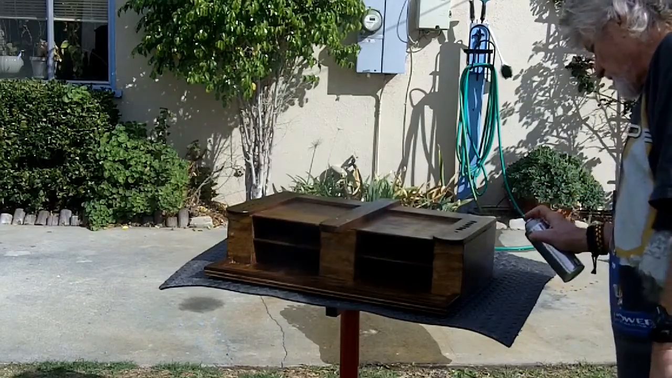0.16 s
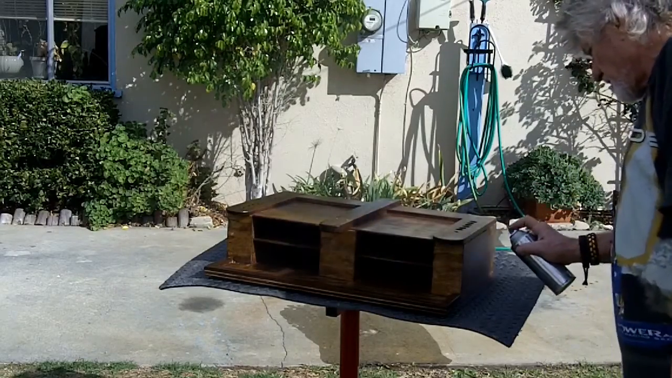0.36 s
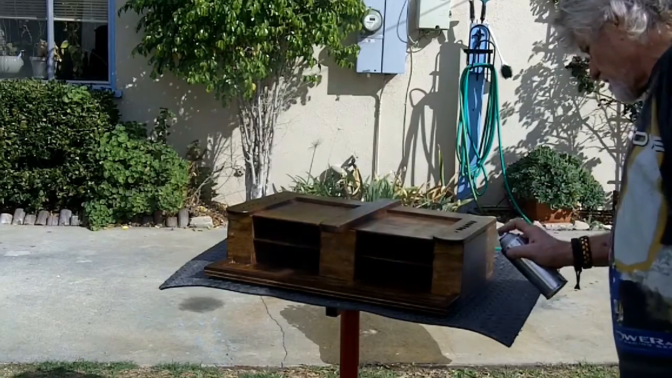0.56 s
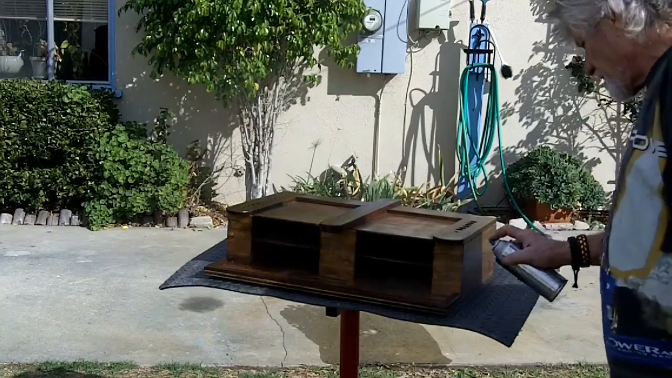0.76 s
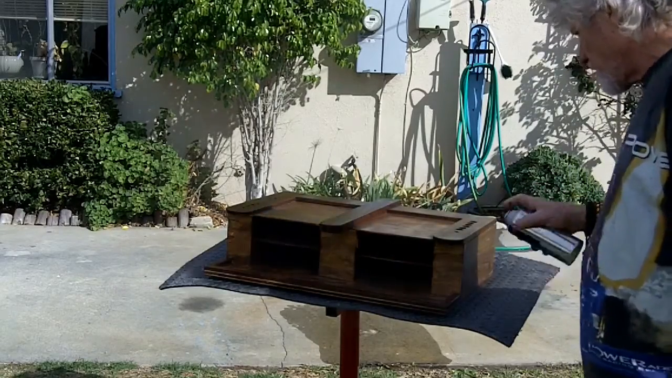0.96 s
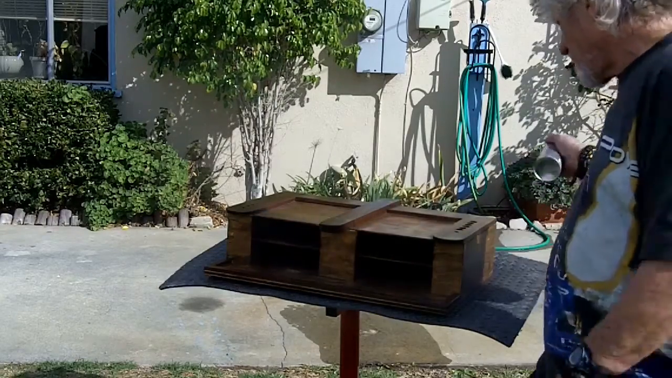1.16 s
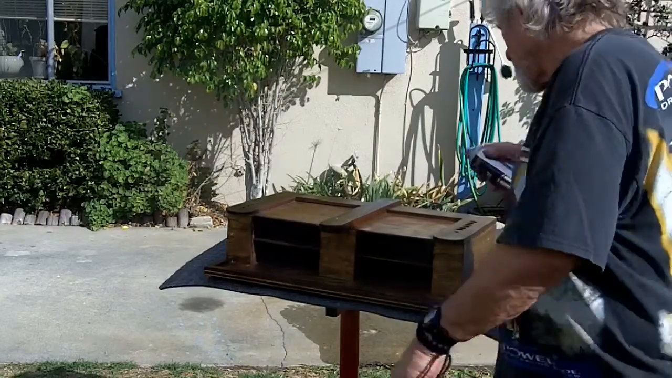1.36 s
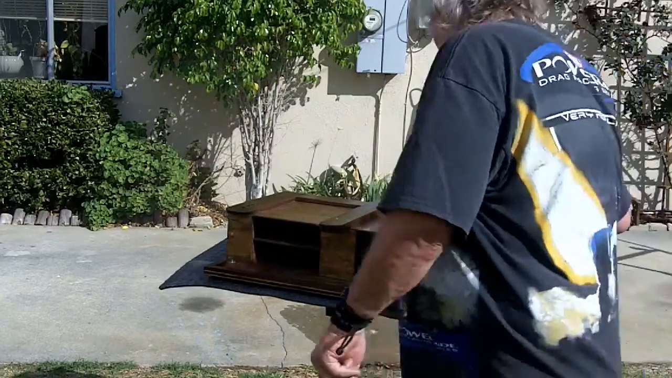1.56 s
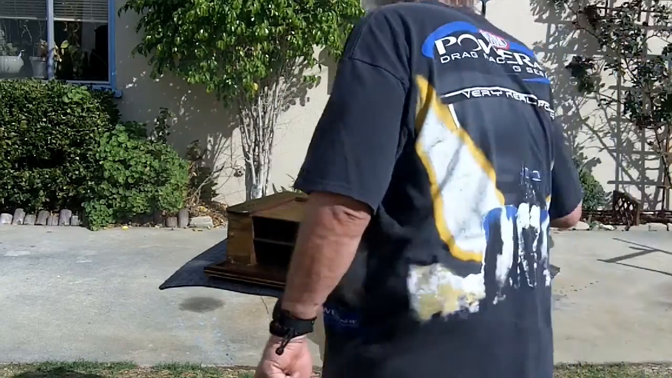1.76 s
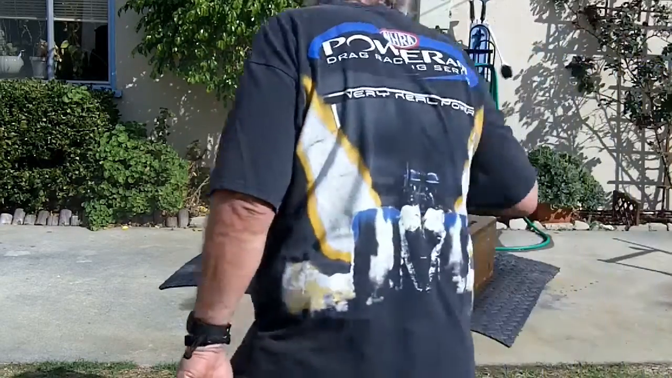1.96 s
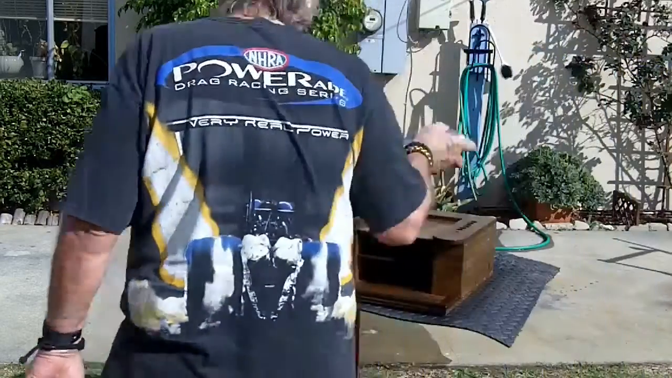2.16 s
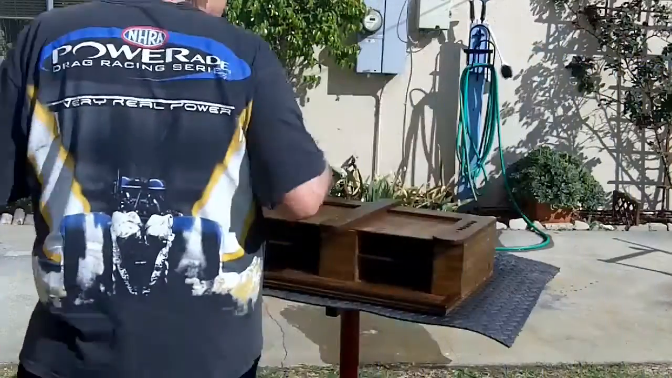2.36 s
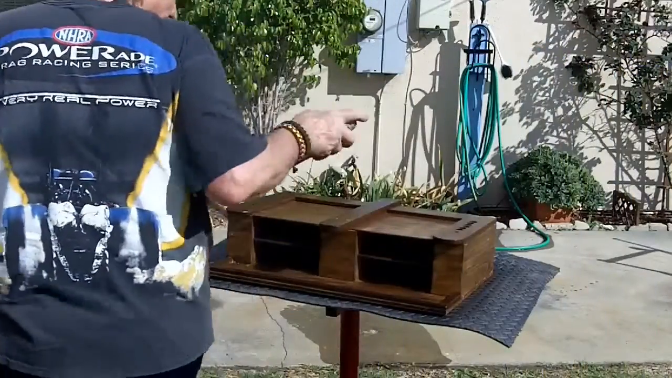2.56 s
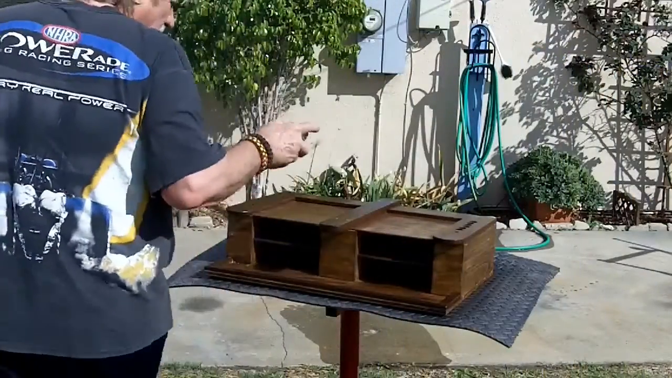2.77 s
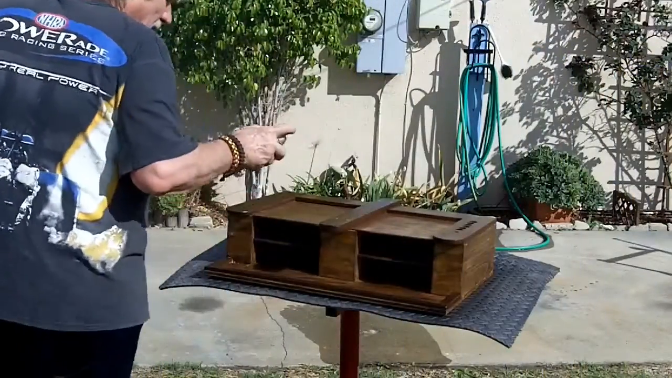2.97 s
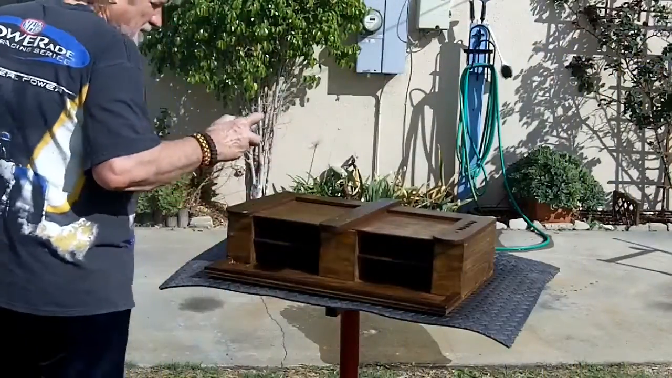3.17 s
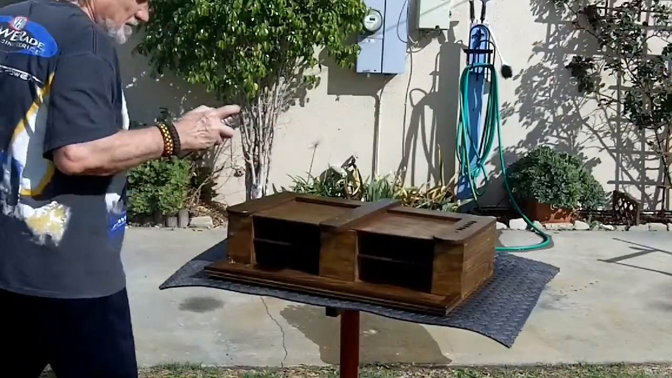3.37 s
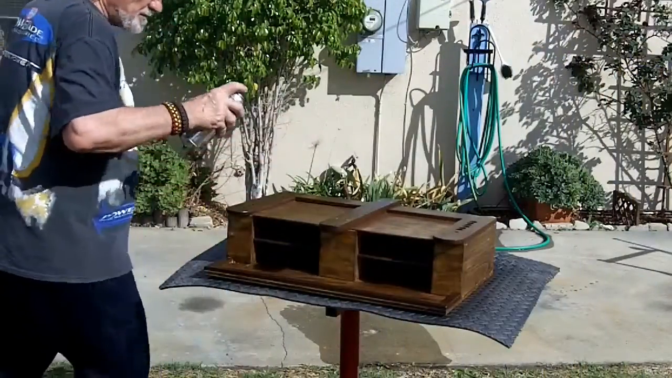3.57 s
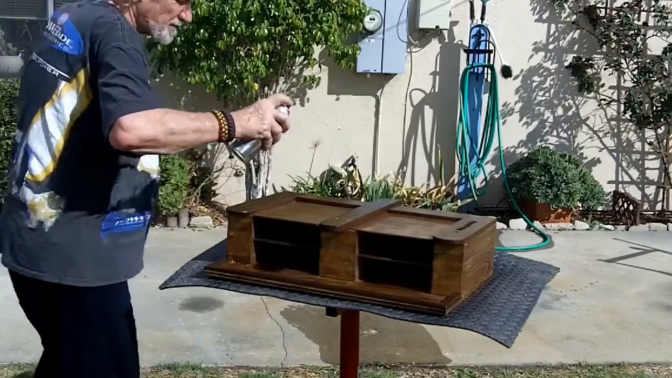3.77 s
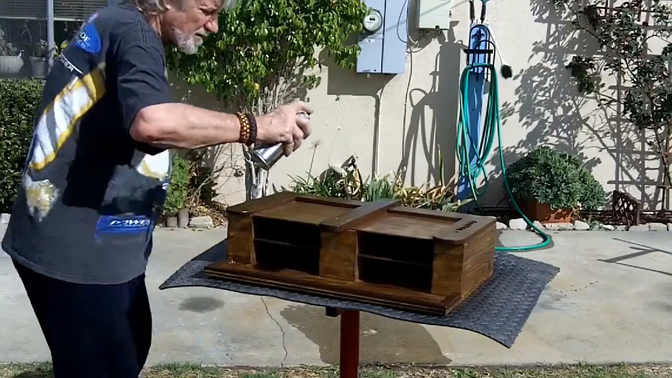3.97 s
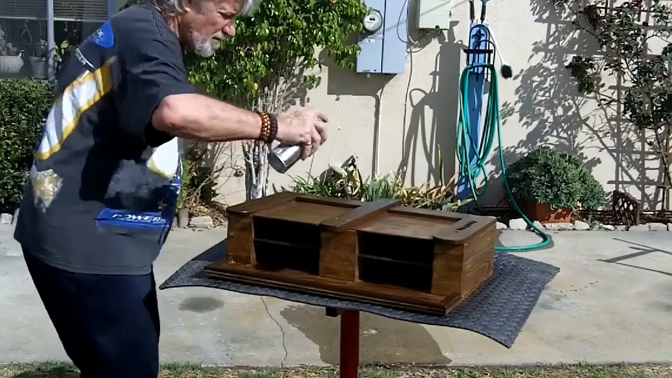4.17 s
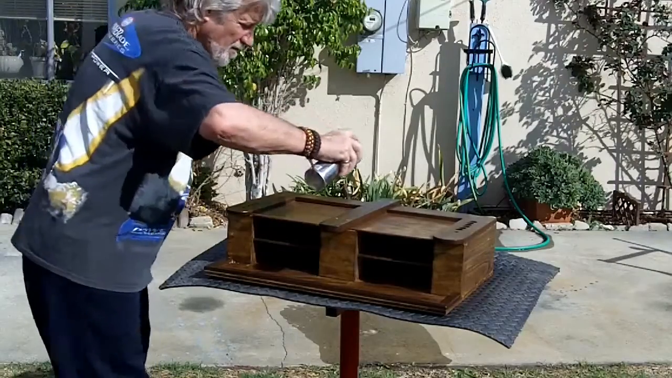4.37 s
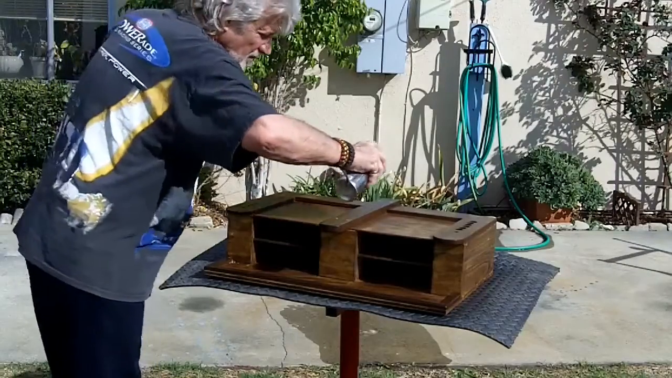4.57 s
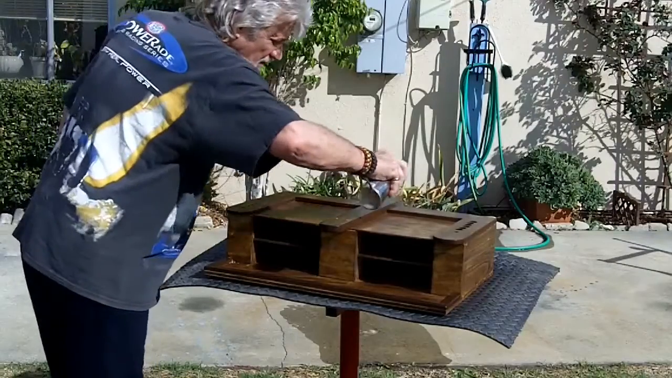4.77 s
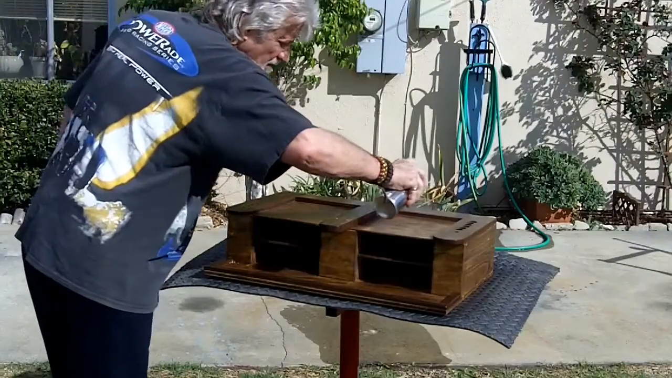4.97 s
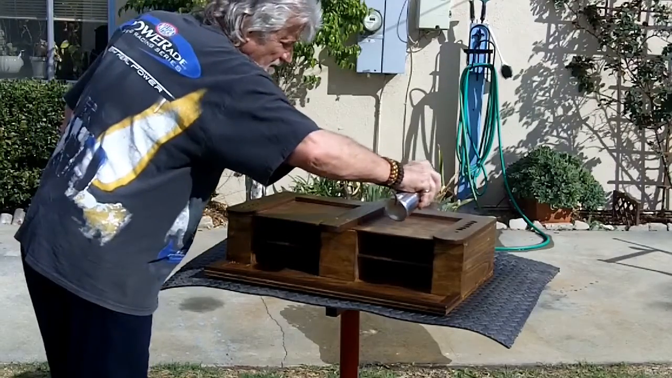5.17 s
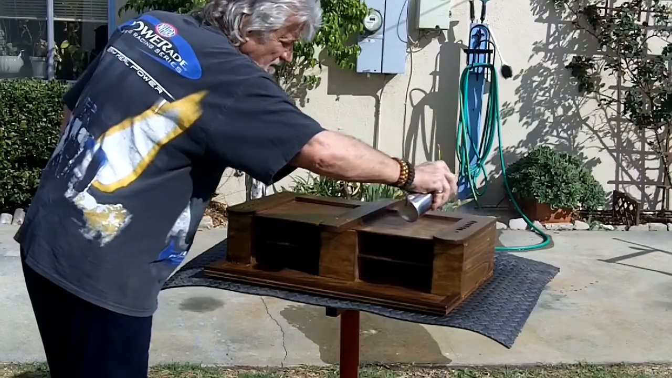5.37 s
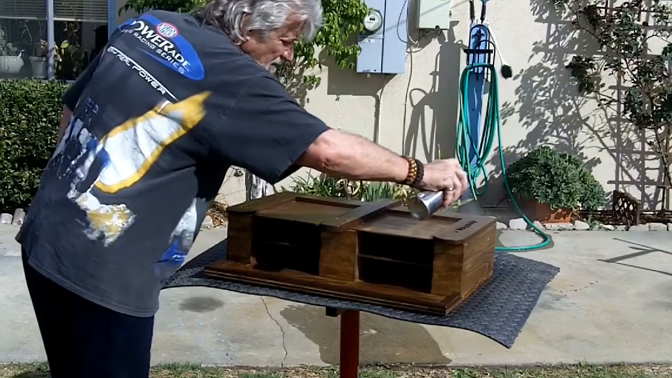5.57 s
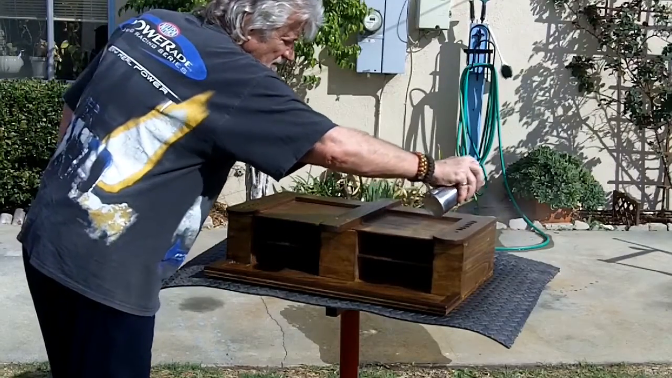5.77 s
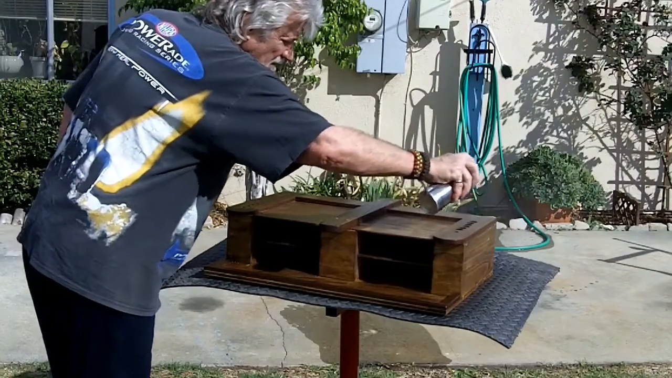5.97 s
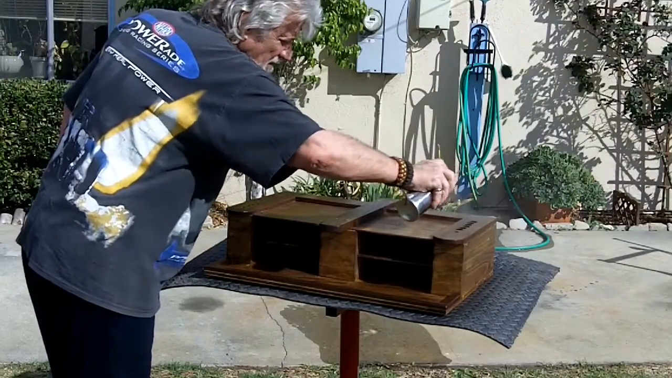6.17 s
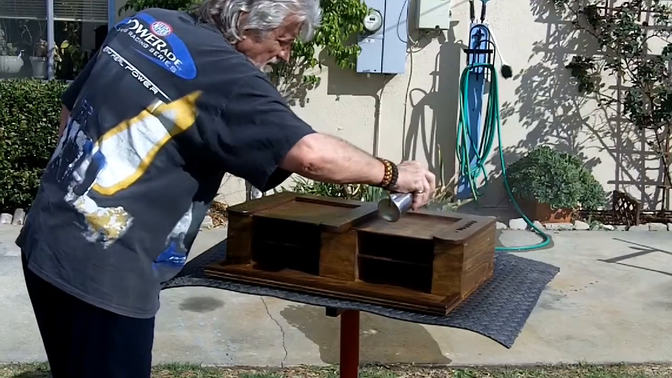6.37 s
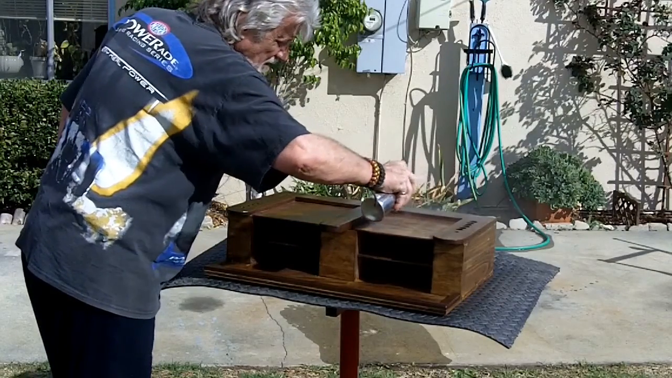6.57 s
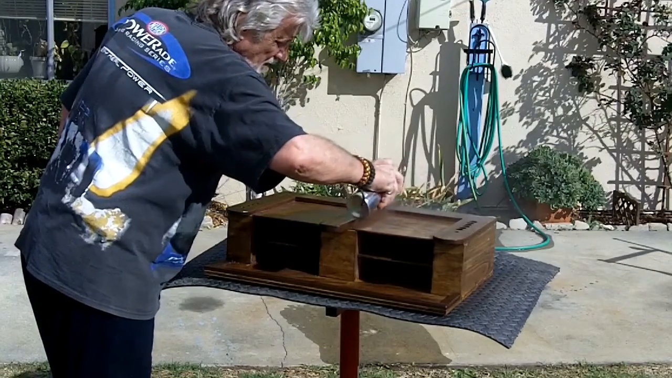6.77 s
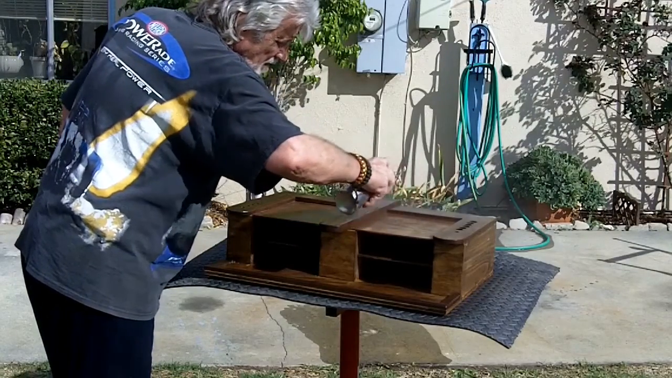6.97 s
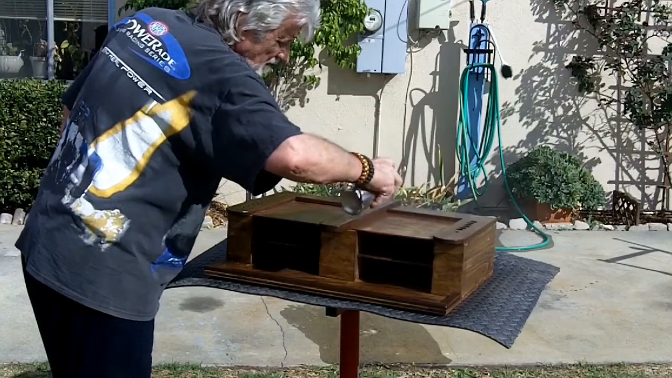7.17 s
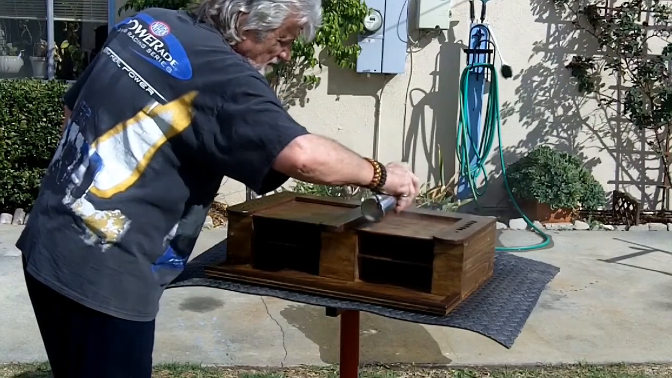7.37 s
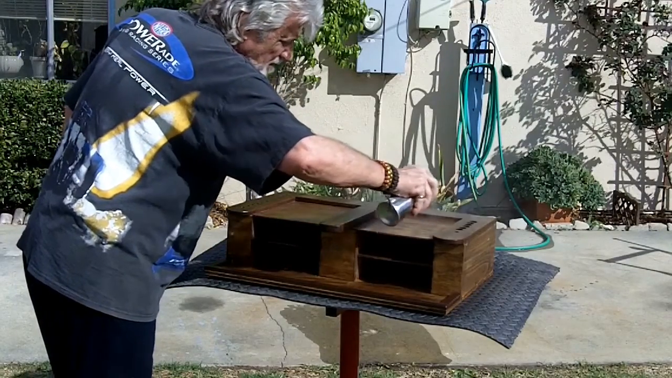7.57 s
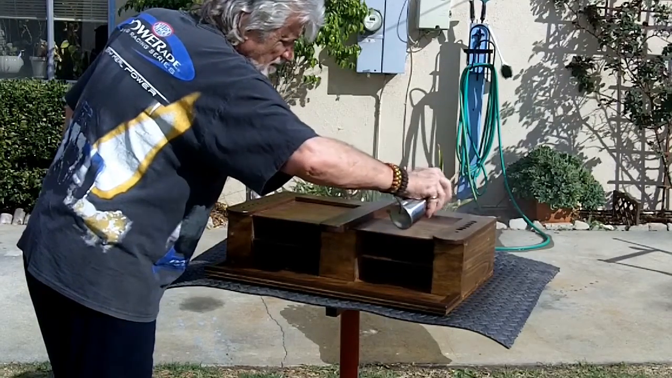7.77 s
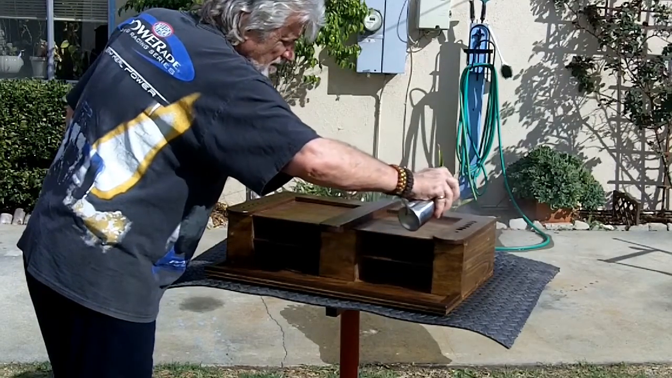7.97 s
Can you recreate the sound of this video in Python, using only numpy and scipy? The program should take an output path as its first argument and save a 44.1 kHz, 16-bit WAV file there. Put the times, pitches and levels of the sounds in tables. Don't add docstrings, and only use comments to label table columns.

```python
import sys
import numpy as np
from scipy import signal
from scipy.fft import rfft, irfft, next_fast_len
from scipy.io import wavfile
from scipy.ndimage import uniform_filter1d

SR = 44100
rng = np.random.default_rng(int(sys.argv[2]) if len(sys.argv) > 2 else 0)


def put_to_file(sound):
    columns = np.atleast_2d(sound).T
    safe = np.clip(columns, -1, 1)
    whole_steps = np.round(safe * 32767)
    wavfile.write(sys.argv[1], SR, whole_steps.astype(np.int16))


def makeup_ratio(level_db):
    decades = np.asarray(level_db, float) / 20
    return 10 ** decades


N = 353241

# pitch in Hz, level in dB, t60 in seconds.
WALL_MODES = [(807, -3.5, 0.016), (1460, 4.5, 0.016), (1800, -0.5, 0.0096), (2000, -8.5, 0.021),
              (2160, -6, 0.045), (2340, -1.5, 0.013)]
# pitch in Hz, level in dB, t60 in seconds.
SHELL_MODES = [(2850, -8.5, 0.0095), (3350, -6.5, 0.0075), (3700, -1, 0.04), (4100, -5, 0.012),
               (4350, -5.5, 0.0077)]
# frequency in Hz, level in dB per Hz.
HISS_SPECTRUM = [(2650, -23), (4500, -4), (5120, -13.5), (5420, -8.5), (6430, 0), (9530, -9.5),
                 (12000, -19), (15500, -29)]


def knocks():
    # pitch in Hz, level in dB, t60 in seconds.
    dome_modes = [(6300, 10, 0.011), (6680, 0.5, 0.019), (7180, -2.5, 0.004), (8300, -2.5, 0.005),
                  (9200, -9.5, 0.0055), (10100, -4.5, 0.005)]
    # pitch in Hz, level in dB, t60 in seconds.
    contact_modes = [(10800, -2, .004), (12200, -5, .003), (13800, -8, .003)]
    # time in seconds, shell, dome and contact pitch in Hz.
    landings = [(1.412, 4010.0, 8550, 10900), (1.4991, 3080.0, 7310.0, 10750.0),
                (1.5035, 3270, 6940, 12920.0), (1.5135, 2950, 9300, 11940), (1.526, 3440.0, 7100, 11120.0),
                (1.6093, 3880, 6610, 10700), (1.7541, 2830, 9440, 10860), (1.7635, 3350, 8900, 10810.0),
                (1.781, 3700, 7380.0, 10780.0), (1.9245, 4200, 6700, 11480.0), (2.0829, 3750, 7900, 11400),
                (2.11, 3400, 7580, 11230.0), (2.254, 3800, 6380.0, 11600), (2.3497, 2900, 7150, 11320),
                (2.406, 3920.0, 7370, 11640), (2.424, 3350.0, 8340, 10700),
                (2.453, 3440.0, 7090.0, 11580.0), (2.4746, 3700.0, 6640, 10750.0),
                (2.5613, 3320, 6540, 11010.0), (2.6794, 3640, 6470, 11340.0), (2.822, 4200, 6700, 11770),
                (2.9929, 3170.0, 6730, 11000), (3.0524, 4000, 7100, 11850.0), (3.0894, 3130, 6840, 11900.0),
                (3.1648, 3700, 6680, 10500)]
    crack_t60_s = [0.0034, 0.0036, .002]
    # from Hz, to Hz, level in dB over the blow, t60 in seconds.
    patter = [
        (2400, 5000, -11.5, 0.019),
        (5830, 10800, -9.5, 0.015),
        (10820, 15000, -16.5, .008),
    ]
    crack_db, ring_db, ring_spread = 8, -14.5, 0.035
    wet_after_s, wet_roughness = 0.0028, 0.4
    touch_s, softer_per_db, hard_db = 0.00013, 0.45, -19

    table = contacts()
    out = np.zeros(N + 4096)
    chance = rng.standard_normal((len(table), 24))
    t = np.arange(2600) / SR
    film = drift(200)
    scatter = [rms_one(band(rng.standard_normal(N), low_hz, high_hz)) for low_hz, high_hz, *_ in patter]
    landed, *cracks_hz = np.transpose(landings)

    def mode(hz, level_db, t60):
        return makeup_ratio(level_db - 60 * t / t60) * np.sin(2 * np.pi * hz * t)

    for (s, wall_hz, wall_db, *upper_db), luck in zip(table, chance):
        at = round(s * SR)
        span = slice(at, at + len(t))
        hit = mode(wall_hz, wall_db - 0.5, 0.01)
        hit += mode(wall_hz, wall_db - 12.5, 0.022)
        hit += mode(670, wall_db - 12.0, 0.0087)
        for (hz, level_db, t60), z in zip(WALL_MODES, luck):
            hit += mode(hz * (1 + 0.065 * z), wall_db + level_db - 12.0 + 3.8 * z, t60)
        k = len(WALL_MODES)
        for group, modes in enumerate((SHELL_MODES, dome_modes, contact_modes)):
            blow_db = upper_db[group]
            crack_hz = np.interp(s, landed, cracks_hz[group])
            hit += mode(crack_hz, blow_db + crack_db, crack_t60_s[group])
            _, _, patter_db, patter_t60 = patter[group]
            hit += makeup_ratio(blow_db + patter_db - 60 * t / patter_t60) * scatter[group][span]
            for hz, level_db, t60 in modes:
                k += 1
                mode_db = blow_db + level_db + ring_db + 3.0 * luck[k]
                hit += (-1) ** k * mode(hz * (1 + ring_spread * luck[k - 1]), mode_db, t60)
        softness_db = max(hard_db - max(wall_db, *upper_db), 0)
        touch = (1 - np.exp(-t / (touch_s * makeup_ratio(softer_per_db * softness_db)))) ** 2
        wetness = wet_roughness * np.clip(t / wet_after_s - 0.5, 0, 1)
        out[span] += touch * hit * (1 + wetness * film[span])
    return signal.sosfilt(signal.butter(2, 250, "high", fs=SR, output="sos"), out[:N])


def contacts():
    # time in seconds, wall, shell, dome and click level in dB.
    square = [
        (1.5035, -28, -24, -27.5, -33.5),
        (1.5146, -27, -21.5, -26.5, -26),
        (1.6093, -19.5, -21, -23, -27.5),
        (1.7543, -27, -22.5, -25, -31),
        (2.4071, -16.5, -5.5, -23.5, -18),
        (2.822, -32, -25.5, -22, -32),
        (3.165, -31.5, -28.5, -44, -43),
    ]
    # time in seconds, wall pitch in Hz, wall, shell and dome level in dB.
    cushioned = [(1.412, 2275, -19, -14.5, -9.5), (1.4225, 2400, -53.5, -37, -34),
                 (1.4392, 2000, -32, -29, -38), (1.499, 1940, -22, -39, -29),
                 (1.5256, 1960, -24, -44, -36.5), (1.7639, 1950, -38, -29, -29),
                 (1.781, 2500, -32, -25.5, -30.5), (1.7935, 1920, -55, -30, -36.5),
                 (1.9249, 1780, -25.5, -29, -31), (2.0302, 1070, -29.5, -38, -52),
                 (2.083, 2160, -29.5, -19, -34), (2.0878, 2240, -46, -28, -26),
                 (2.11, 2650, -33, -25, -33.5), (2.254, 1145, -27, -21.5, -28.5),
                 (2.2582, 2100, -38.5, -24.5, -36), (2.349, 2100, -22.5, -39, -41),
                 (2.4245, 2410, -16.5, -13, -23), (2.452, 2340, -36, -22, -38),
                 (2.4746, 2390, -20, -18, -27.5), (2.481, 1530, -29.5, -38, -40),
                 (2.5614, 1790, -19.5, -19, -22.5), (2.6797, 2010, -29, -38, -40.5),
                 (2.9929, 2160, -25, -26, -29.5), (3.052, 2090, -20, -27.5, -38),
                 (3.0877, 2070, -25, -27, -35.5)]
    # time in seconds, wall and shell level in dB.
    taps = [(1.637, -28, -29), (1.6636, -28.5, -34), (1.711, -30, -37.5), (1.7384, -28.5, -48),
            (1.9532, -34, -32), (1.986, -32, -38.5), (2.0552, -32.5, -42), (2.123, -56, -28),
            (2.1365, -35, -31), (2.281, -34, -30), (2.3133, -27, -32), (2.374, -30, -36),
            (2.4345, -41, -27), (2.5893, -32, -29), (2.717, -29.5, -36), (2.7326, -33, -41),
            (2.779, -38, -38), (2.7861, -32.5, -37), (2.8487, -36, -39), (2.8606, -36, -37),
            (2.9588, -28.5, -42), (3.02, -54, -32), (3.1315, -29.5, -34), (3.1678, -49, -33),
            (3.1868, -35.5, -35), (3.2516, -32, -34.5), (3.2898, -34.5, -48), (3.381, -37, -33)]
    # time in seconds, wall, shell and dome level in dB.
    ticks = [(1.395, -48, -50, -38), (1.479, -49, -33, -49), (1.5353, -26.5, -44, -39),
             (1.5445, -34, -44, -38), (1.553, -30, -50, -50), (1.619, -40, -33, -36),
             (1.6732, -40, -48, -46), (1.679, -37, -55, -55), (1.6905, -38, -55, -55),
             (2.092, -42, -36, -26.5), (2.604, -45, -34, -50), (2.8665, -38, -44, -42),
             (2.872, -37, -45, -47), (2.891, -48, -52, -48), (2.9355, -35.5, -40, -43),
             (2.9475, -36, -41, -40), (2.9703, -35, -46, -51), (2.982, -42, -49, -54),
             (3.08, -44, -48, -45.5), (3.1145, -40, -45, -54), (3.319, -38, -50, -52),
             (3.342, -41, -52, -50), (3.361, -44, -50, -41), (3.4055, -50, -40, -52),
             (3.422, -42, -38, -44), (3.4598, -44, -37, -46), (3.48, -44.5, -39, -50)]
    # time in seconds, pitch in Hz.
    grip_curve = [(1.4, 1986), (1.95, 1920), (2.3, 2100), (2.45, 2390), (2.8, 2280), (2.95, 2100),
                  (3.2, 2170), (3.5, 2220)]

    def grip(s):
        return np.interp(s, *np.transpose(grip_curve))

    light = [(*row, row[-1] - 10) for row in taps] + ticks
    luck = rng.standard_normal(len(light))
    light = [(s, grip(s) * (1 + 0.021 * z), *levels) for (s, *levels), z in zip(light, luck)]
    soft = [(*row, -22 + 0.7 * row[-1]) for row in cushioned + light]
    return np.array([(s, grip(s), *levels) for s, *levels in square] + soft)


def yard(x):
    # delay in seconds, level in dB, dulled above Hz.
    echoes = [
        (.0042, -12.5, 9020),
        (0.0097, -32, 6860),
        (0.028, -26.5, 5010),
    ]
    out = x.copy()
    for lag_s, level_db, dull_hz in echoes:
        lag = round(lag_s * SR)
        out[lag:] += makeup_ratio(level_db) * signal.lfilter(*signal.butter(1, dull_hz, fs=SR), x)[:-lag]
    t = np.arange(SR // 4) / SR
    tail = rng.standard_normal((2, len(t))) * makeup_ratio(-60 * t / 0.28) * np.clip(t / 0.0057, 0, 1)
    tail = signal.lfilter(*signal.butter(1, 7000, fs=SR), tail)
    tail = tail[0] + 0.12 * tail[1] * [[1], [-1]]
    unlike = makeup_ratio(-29) * (np.roll(out, 9) - np.roll(out, 23)) * [[1], [-1]]
    return out + unlike + makeup_ratio(-52.5) * signal.fftconvolve(x[None], tail, axes=1)[:, :N]


def spray():
    # start and end in seconds, level in dB, echo delay in ms at start and at end.
    presses = [
        (0.132, 1.017, -61, 0.51, 0.81),
        (4.839, 5.973, -64.5, 0.747, 0.68),
        (6.188, 7.221, -65, 0.59, 0.834),
        (7.396, 8.096, -64, 0.69, 0.98),
    ]
    # frequency in Hz, level in dB per Hz.
    side_on_spectrum = [(900, -2), (1600, -15.5), (2700, 0), (4600, 2.5), (6500, -0.5), (8300, -1.5),
                        (9700, -7.5), (12000, -10), (14500, -13), (15500, -42.5)]
    # frequency in Hz, level in dB per Hz.
    jet_spectrum = [(900, -0.5), (1600, -18), (2700, -2.5), (4600, -1.5), (6200, -2), (7200, 0.5),
                    (8900, -1), (9700, -15), (14500, -14), (15500, -41.5)]
    t, gain, lag_ms = np.arange(N) / SR, np.zeros(N), np.ones(N)
    for start, end, jet_db, lag_from, lag_to in presses:
        on = np.clip((t - start) / 0.0018, 0, 1) * np.clip((end - t) / 0.011, 0, 1)
        opening = np.exp(-np.abs(t - start - 0.008) / 0.013)
        closing = np.exp(-np.abs(end - t - 0.015) / 0.0056)
        pop_db = 9 * (opening + 0.86 * closing)
        gain += on * makeup_ratio(jet_db + pop_db)
        lag_ms = np.where(on > 0, np.interp(t, [start, end], [lag_from, lag_to]), lag_ms)
    jet = np.where(t < 3, coloured(side_on_spectrum), coloured(jet_spectrum))
    bright = band(jet, 5800, 9600)
    surge = makeup_ratio(7.3 * np.exp(-((t - 5.08) / 0.06) ** 2))
    late = np.arange(N) - (lag_ms + 0.02 * drift(1.5)) * SR / 1000
    echo = np.array([np.interp(late, np.arange(N), side) for side in bright])
    echo *= np.interp(t, [0.4, 0.7], [0.2, 1.0])
    return gain * makeup_ratio(0.7 * drift(3)) * (jet - bright + surge * (bright + 0.36 * echo))


def movement():
    # time in seconds, can body and hiss level in dB.
    sloshes = [(1.43, -46.5, -53), (1.54, -46.5, -62.5), (1.63, -64, -61), (1.7, -48.5, -67),
               (1.769, -44.5, -52.5), (1.941, -47, -62.5), (2.02, -51.5, -68), (2.101, -44.5, -55),
               (2.16, -50.5, -71), (2.27, -49, -60.5), (2.33, -48, -65.5), (2.44, -44, -58.5),
               (2.5, -46, -67), (2.6, -48.5, -70.5), (2.76, -48, -63.5), (2.81, -58, -81),
               (2.86, -47, -61.5), (3.03, -56, -66.5), (3.2, -56, -74), (3.301, -59, -60.5),
               (3.5, -56.5, -70)]
    # frequency in Hz, level in dB per Hz.
    body_spectrum = [(240, -41), (400, -14), (1680, -6.5), (2210, -1.5), (2990, -4), (3590, -4.5),
                     (4220, -2.5), (5300, -20), (6890, -54.5), (11700, -120)]
    s, body_db, hiss_db = np.transpose(sloshes)
    grains = rng.standard_normal((2, 2, N)) * makeup_ratio(2.2 * drift(150))
    body = coloured(body_spectrum, grains[0])
    can_modes = WALL_MODES[3:] + SHELL_MODES[2:3]
    can_hum = rms_one(sum(makeup_ratio(level_db) * ring(grains[0, 0], hz, 0.02) for hz, level_db, _ in can_modes))
    can = thrown(s, body_db - 2.0, 130.5) * (body + 0.59 * can_hum)
    splash = thrown(s, hiss_db + 7.0, 158) * coloured(HISS_SPECTRUM, grains[1])
    return can + splash


def thrown(s, level_db, fall_db_per_s):
    rise_db_per_s = 700
    t = np.arange(N // 64 + 2)[:, None] * 64 / SR - s
    shape_db = np.minimum(rise_db_per_s * t, -fall_db_per_s * t)
    power = np.sum(makeup_ratio(level_db + shape_db) ** 2, axis=1)
    return np.interp(np.arange(N) / 64, np.arange(len(power)), np.sqrt(power))


def scuffs():
    # time and half width in seconds, body and hiss
    # level in dB.
    rubs = [(.0, 0.0098, -57.5, -67), (0.034, 0.044, -63, -59.5), (1.08, 0.024, -69, -70.5),
            (1.13, 0.032, -72, -62.5), (1.2, 0.025, -62.5, -58), (1.24, 0.034, -68.5, -64),
            (1.375, 0.037, -73, -62), (3.32, 0.027, -56.5, -77), (3.791, 0.048, -60, -63),
            (3.95, 0.021, -65.5, -64.5), (4.098, 0.018, -52.5, -58), (4.14, 0.11, -67, -71.5),
            (4.266, 0.039, -61, -59), (4.498, 0.042, -65, -63), (4.55, 0.024, -65, -70),
            (4.621, 0.044, -60.5, -70), (4.809, 0.015, -71, -80.5), (5.083, 0.0016, -54, -59),
            (7.212, 0.0042, -69, -59.5)]
    # time and half width in seconds, body and hiss level in dB.
    small_clicks = [(1.036, 0.0027, -60, -63), (1.057, 0.0015, -75, -58), (1.078, 0.0025, -68, -64),
                    (1.125, 0.0032, -72, -63), (4.607, 0.0023, -59, -62), (4.628, 0.0025, -71, -71),
                    (4.645, .003, -65, -64), (4.678, .003, -73, -66), (4.8, .003, -70, -66),
                    (4.82, 0.0026, -71, -66), (5.034, 0.0034, -72, -59)]
    # frequency in Hz, level in dB per Hz.
    sole_spectrum = [(180, -23), (300, -8), (647, -3), (1500, -10.5), (1670, -10), (3200, -9.5),
                     (5300, -24), (6890, -45), (11700, -120)]
    t, body, hiss = np.arange(N) / SR, np.zeros(N), np.zeros(N)
    for s, width, body_db, hiss_db in rubs + small_clicks:
        swell = np.exp(-((t - s) / width) ** 2)
        body += makeup_ratio(body_db) * swell
        hiss += makeup_ratio(hiss_db) * swell
    grit = makeup_ratio(3.1 * drift(148))
    return grit * (body * coloured(sole_spectrum) + hiss * coloured(HISS_SPECTRUM))


def birds():
    # middle and half length in seconds, pitch in Hz at start and at end of the glide, level in dB.
    notes_sung = [(.5, 0.088, 2940, 2800, -63), (3.655, 0.04, 3300, 3400, -64),
                  (3.92, 0.04, 2800, 2950, -66), (4.22, .09, 2800, 3000, -64),
                  (4.249, .04, 3200, 3800, -61), (4.313, 0.09, 1950, 2400, -59),
                  (4.39, 0.22, 3800, 3600, -66), (4.603, 0.16, 3700, 3100, -67.5),
                  (5.56, 0.044, 3300, 3700, -61), (5.592, 0.054, 3450, 4200, -66),
                  (5.638, 0.07, 4100, 4100, -66), (5.864, 0.056, 2930, 3100, -61),
                  (5.887, 0.043, 3250, 3700, -63), (5.929, 0.072, 3240, 3420, -57.5),
                  (5.971, 0.046, 3420, 4200, -54.5), (5.976, 0.04, 2850, 2700, -57.5),
                  (6.009, 0.055, 3130, 3140, -52.5), (6.115, 0.04, 3120, 3120, -67),
                  (6.278, 0.046, 3350, 3320, -60.5), (6.31, 0.076, 2890, 2460, -61),
                  (6.4, .08, 2530, 2500, -70), (7.496, 0.065, 2900, 3100, -66)]
    out, waver, flutter = np.zeros(N), 1 + 0.0135 * drift(87), 0.73 + 0.69 * drift(74)
    for s, length, from_hz, to_hz, level_db in notes_sung:
        span = slice(max(round((s - length) * SR), 0), round((s + length) * SR))
        along = 2 * (np.arange(N)[span] / SR - s) / length
        hz = np.interp(along, [-1, 1], [from_hz, to_hz]) * waver[span]
        phase = 2 * np.pi * np.cumsum(hz) / SR
        out[span] += makeup_ratio(level_db - 12 * along ** 2) * flutter[span] * np.sin(phase)
    t = np.arange(SR // 5) / SR
    smear = rng.standard_normal(len(t)) * makeup_ratio(-60 * t / 0.13)
    smear /= np.sqrt(np.sum(smear ** 2))
    return 0.91 * out + 0.5 * signal.fftconvolve(out, smear)[:N]


def drone():
    # time in seconds, level in dB, octave over firing rate in dB.
    engine_levels = [(0.0, -53, -2.5), (0.4, -68, 0), (1.2, -55, 6), (2.0, -54, 5.5), (2.8, -52, -3.5),
                     (3.6, -60.5, 4), (4.4, -57.5, -8.5), (5.2, -61.5, -1.5), (5.6, -56, -15),
                     (6.0, -65.5, 9), (6.4, -57, -4), (7.2, -59.5, -3.5), (8.0, -54, -4.5)]
    # time in seconds, firing rate in Hz.
    firing_rate = [(0, 93.2), (2, 92.2), (4, 91.2), (8.01, 89.6)]
    first_db, octave_db = in_time(engine_levels)
    phase = 2 * np.pi * np.cumsum(in_time(firing_rate)[0] + 0.3 * drift(4)) / SR
    first = makeup_ratio(first_db + 1.1 * drift(6.7)) * np.sin(phase)
    octave = makeup_ratio(first_db + octave_db + 2.0 * drift(9.1)) * np.sin(2 * phase + 1.7)
    return np.sqrt(2) * (first + octave)


def machines():
    # pitch in Hz, level in dB.
    hums = [(30, -54), (48.5, -53), (488, -72.5)]
    out = np.zeros(N)
    for hz, level_db in hums:
        swell = makeup_ratio(level_db + 2.03 * drift(1.9))
        phase = 2 * np.pi * np.cumsum(hz * (1 + 0.0153 * drift(3.3))) / SR
        out += np.sqrt(2) * swell * np.sin(phase)
    return out


def town():
    # frequency in Hz, level in dB per Hz.
    town_spectrum = [(9, -24), (18, 0), (48, -7), (60, -16.5), (140, -23.5), (290, -27.5), (489, -32.5),
                     (1040, -41), (3230, -50.5), (4300, -50.5), (5400, -58), (6500, -53), (9000, -56.5),
                     (15500, -63.5)]
    passing_db = 3.5 * np.exp(-((np.arange(N) / SR - 1.6) / 0.73) ** 2)
    wash = coloured(town_spectrum)
    rumble = makeup_ratio(-43) * rms_one(band(wash, 0, 70))
    traffic = makeup_ratio(-55 + passing_db + 0.88 * drift(6.4)) * rms_one(band(wash, 70, 1500))
    steady_hiss = makeup_ratio(-67.5) * rms_one(band(wash, 1500, SR))
    return rumble + traffic + steady_hiss


def coloured(spectrum, source=None):
    # frequency in Hz, left-right likeness from 0 to 1.
    likeness = [(25, 1), (125, 0.97), (400, 0.91), (2000, 0.95), (6000, 1), (12000, 0.92)]
    size = next_fast_len(N)
    hz = np.arange(size // 2 + 1) * SR / size
    mid, side = rfft(rng.standard_normal((2, N)) if source is None else source, size)
    alike = np.clip(at_hz(likeness, hz), 0, 1)
    pair = np.sqrt(1 + alike) * mid + np.sqrt(1 - alike) * side * [[1], [-1]]
    return rms_one(irfft(pair * makeup_ratio(at_hz(spectrum, hz)), size)[:, :N])


def ring(clicks, hz, t60):
    r, w = makeup_ratio(-60 / (t60 * SR)), 2 * np.pi * hz / SR
    return signal.lfilter([0, np.sin(w)], [1, -2 * r * np.cos(w), r * r], clicks + 1e-18)


def drift(rate):
    r = np.exp(-80 * np.pi * rate / SR)
    slow = signal.lfilter([1], [1, -2 * r, r * r], rng.standard_normal(N // 40 + 2002))[2000:]
    return np.interp(np.arange(N) / 40, np.arange(len(slow)), rms_one(slow - slow.mean()))


def band(x, low_hz, high_hz):
    size = next_fast_len(N)
    hz = np.arange(size // 2 + 1) * SR / size
    return irfft(rfft(x, size) * ((hz >= low_hz) & (hz < high_hz)), size)[..., :N]


def patches(open_when):
    return uniform_filter1d(1. * open_when, size=400)


def rms_one(x):
    return x / np.sqrt(np.mean(x ** 2) + 1e-20)


def in_time(rows, outside=None):
    s, *columns = np.transpose(rows)
    return [np.interp(np.arange(N) / SR, s, c, outside, outside) for c in columns]


def at_hz(points, hz):
    point_hz, value = np.transpose(points)
    return np.interp(np.log(hz + 1), np.log(point_hz), value)


def scene():
    can = yard(knocks()) + movement() + spray()
    return can + scuffs() + birds() + drone() + machines() + town()


def low_pass(x):
    return signal.sosfilt(signal.butter(12, 16340, fs=SR, output="sos"), x)


def record(dry):
    offset = [
        [.0022],
        [.0230],
    ]
    top_bands = [12800, 13200, 13700, 14200, 14600, 15050, 16300]
    w = 2 * np.cos(2 * np.pi * 5480 / SR)
    wide, deep = np.exp(-np.pi * 900 / SR), np.exp(-np.pi * 120 / SR)
    x = signal.lfilter([1, -w * deep, deep ** 2], [1, -w * wide, wide * wide], dry)
    x = x * makeup_ratio(np.array([[-0.1], [0.1]]))
    mid, side = (x[0] + x[1]) / 2, (x[0] - x[1]) / 2
    side = side - band(side, 110, 6000) * patches(drift(6) < -0.1)
    kept, shared = band(mid, 0, top_bands[0]), drift(5.5)
    for low, high in zip(top_bands, top_bands[1:]):
        part = band(mid, low, high)
        level_db = 10 * np.log10(uniform_filter1d(part ** 2, size=3000) + 1e-20)
        needed_db = np.median(level_db) + (12 if high > 16000 else -1.3)
        kept += part * patches(level_db + 1.5 * shared + 2.5 * drift(14) > needed_db)
    return low_pass(kept + side * [[1], [-1]] + offset)


dry = scene()
out = record(dry)
put_to_file(out)
```